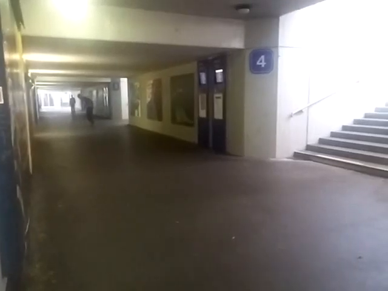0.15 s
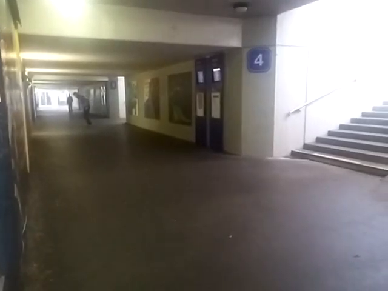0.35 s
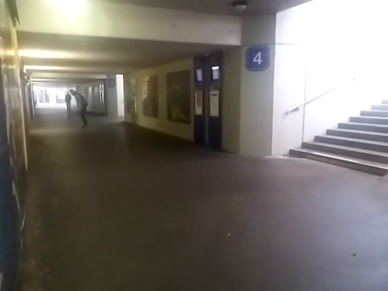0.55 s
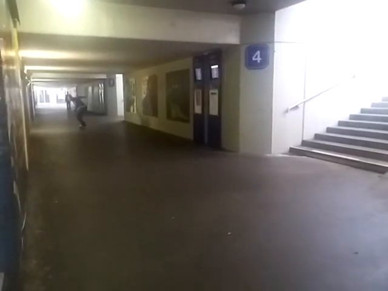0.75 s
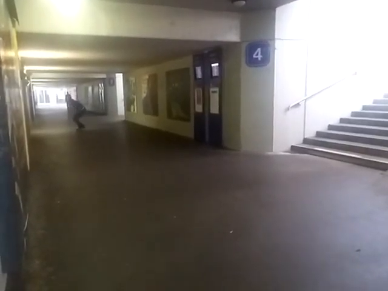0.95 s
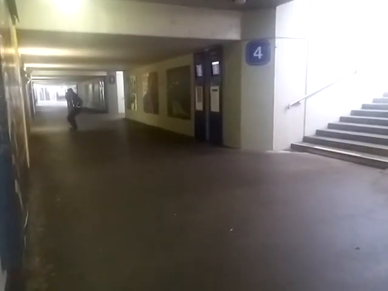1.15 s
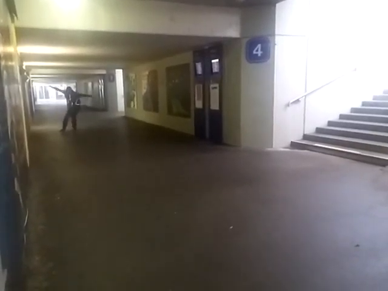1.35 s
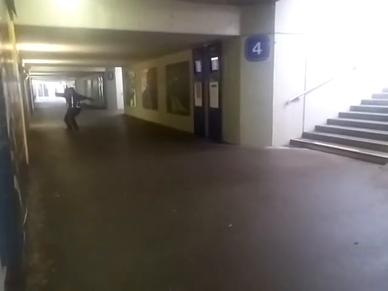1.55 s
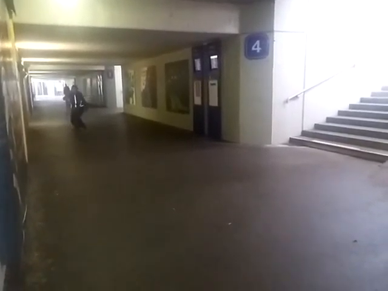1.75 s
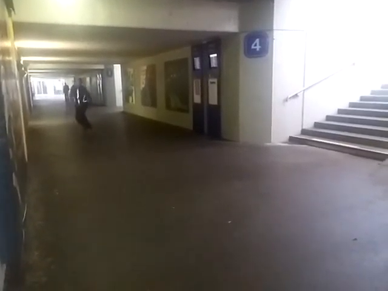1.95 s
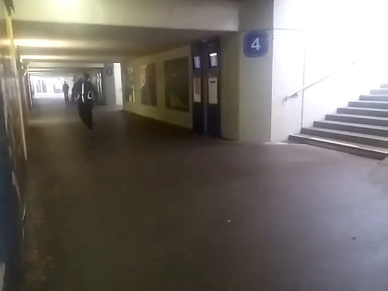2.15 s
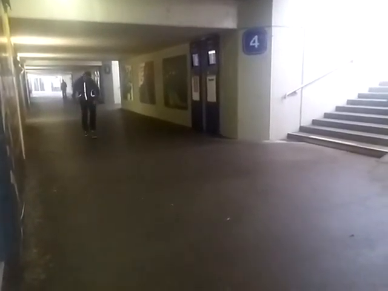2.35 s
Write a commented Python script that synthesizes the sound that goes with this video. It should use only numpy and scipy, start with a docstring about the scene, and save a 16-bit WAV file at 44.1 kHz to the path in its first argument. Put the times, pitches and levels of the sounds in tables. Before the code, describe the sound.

A skateboard rolls over a gritty floor, slides sideways with a loud juddering scrape, a few knocks and a brief squeal, then rolls on. It is heard from a distance in an echoing concrete underpass.

```python
"""A skateboard slides sideways in a long concrete underpass: four wheels scrape, judder and briefly
squeal, then grip again, with a few knocks under the rider's weight. Before and after, the wheels drone
and hiss over floor grit and the trucks tick now and then, above a low murmur of distant noise.
Two microphones 13 cm apart stand far enough off that nearly everything arrives as reverberation;
the slide just overloads them."""
import sys
import numpy as np
from scipy import signal
from scipy.fft import rfft, irfft
from scipy.io import wavfile

SR = 44100
rng = np.random.default_rng(int(sys.argv[2]) if len(sys.argv) > 2 else 0)


def put_to_file(sound):
    """Save the sound as 16-bit audio at rate SR, in the file named by the first command-line argument."""
    columns = np.atleast_2d(sound).T  # one column per channel
    safe = np.clip(columns, -1, 1)
    whole_steps = np.round(safe * 32767)
    wavfile.write(sys.argv[1], SR, whole_steps.astype(np.int16))


N = 110250

GROWL_HZ, HISS_HZ, TREBLE_HZ = 400, 1370, 3300  # band edges: growl below, hiss and treble above
CHATTER_HZ, CHATTER_DB = 35.3, 2  # judder of the sliding wheels: speed and level spread


def undb(db):
    """Decibels to gain."""
    return 10 ** (np.asarray(db) / 20)


def unit(x):
    """Scale to an rms of 1."""
    return x / np.sqrt(np.mean(x ** 2) + 1e-18)


def clock():
    """Time of each sample in seconds."""
    return np.arange(N) / SR


def freqs():
    """Frequency of each spectral bin in Hz."""
    return np.maximum(np.arange(N // 2 + 1) * SR / N, 1)


def on_log(points):
    """Spread (Hz, value) points over the bins, along a log-frequency axis."""
    hz, values = np.array(points, float).T
    return np.interp(np.log(freqs()), np.log(np.maximum(hz, 1)), values)


def below(hz):
    """Gain of a smooth low-pass."""
    return 1 / (1 + (freqs() / hz) ** 6)


def bell(hz, octaves):
    """Gain of a bell-shaped band around hz."""
    return np.exp(-.5 * (np.log2(freqs() / hz) / octaves) ** 2)


def shape(x, gain):
    """Filter by a gain for each frequency."""
    return irfft(rfft(x) * gain, N)


def walk(hz):
    """Smooth random wander with a spread of 1."""
    return unit(shape(rng.standard_normal(N), np.exp(-(freqs() / hz) ** 2)))


def grains(per_s, spread_db):
    """Dense tiny impacts of uneven size."""
    hits = rng.random(N) < per_s / SR
    return unit(hits * rng.standard_normal(N) * undb(spread_db * walk(per_s)))


def burst(start, ring_s, gain, attack_s=.003):
    """A short rattle that dies away in the given colour."""
    age = np.maximum(clock() - start, 0)
    envelope = (1 - np.exp(-(age / attack_s) ** 2)) * np.exp(-age / ring_s)
    return unit(shape(rng.standard_normal(N), gain)) * envelope


def at_mics(pair, spacing_m=.13, left_leads_s=47e-6):
    """Two unrelated signals become a diffuse field at a spaced pair: alike only in the bass."""
    alike = np.sinc(2 * freqs() * spacing_m / 343)
    delay = np.exp(-2j * np.pi * freqs() * left_leads_s)
    right = shape(pair[0], alike * delay) + shape(pair[1], np.sqrt(1 - alike ** 2))
    return np.array([pair[0], right])


def underpass(direct_db=-15, early_db=-1.5, early_s=.017):
    """Response from far off: weak direct sound, a cluster of wall echoes, a long tail that darkens."""
    # Decay between the concrete walls. Each row: frequency in Hz, reverberation time in seconds.
    decay_times = [(100, 1.9), (500, 1.88), (1000, 1.36), (2000, 1.48), (4000, 1.6), (8000, 0.78),
                   (14000, 0.49)]
    t, noise, tail = clock(), rng.standard_normal((2, N)), 0
    for hz, t60 in decay_times:
        band = on_log([(f, f == hz) for f, _ in decay_times])
        tail = tail + shape(noise, band) * unit(undb(-60 * t / t60))
    early = unit(rng.standard_normal((2, N)) * np.exp(-t / early_s))
    arrival = SR // 1000
    echoes = np.roll(tail + undb(early_db) * early, arrival, axis=1)
    response = at_mics(echoes) / np.sqrt(N)
    response[:, arrival] += undb(direct_db)
    return unit(response) / np.sqrt(N)


def in_underpass(x):
    """Carry a sound down the underpass to the microphones; each spot has its own echoes."""
    return signal.fftconvolve(x[None], underpass(), axes=1)[:, :N]


def murmur(level_db=-44):
    """Distant noise hums low and steadily all around the microphones."""
    diffuse = at_mics(rng.standard_normal((2, N)))
    return undb(level_db) * unit(shape(diffuse, bell(hz=168.5, octaves=.24)))


def truck_ticks():
    """The trucks tick lightly as the board rolls, some ticks brighter than others."""
    # Each row: start in seconds, level in dB, ring time in seconds, tilt in dB per octave.
    ticks = [(.278, -38, .008, 2), (.396, -26, 0.0076, -2.5), (2.135, -36, 0.012, 5)]
    # Spectrum of a tick. Each row: frequency in Hz, level in dB.
    colour = [(500, -14), (2300, -2.5), (4000, -8), (6600, 1.5), (8000, -13), (10500, -12), (14500, -38)]
    octaves = np.log2(freqs() / 4000)
    return sum(undb(db) * burst(start, ring_s, undb(on_log(colour) + tilt * octaves))
               for start, db, ring_s, tilt in ticks)


def board_gain(colour):
    """A broad colour with the resonances of wheels and deck on top."""
    # Each row: resonance in Hz, width in Hz, lift in dB.
    modes = [(732, 54, 2), (1515, 23, 3), (1924, 116, 3), (2203, 190, 4)]
    peaks_db = sum(db / (1 + (2 * (freqs() - hz) / width) ** 2) for hz, width, db in modes)
    return undb(on_log(colour) + peaks_db)


def rolling_wheels(turns_per_s=32, throb_db=-.5, grit_db=-2.5):
    """Floor grit shakes the turning wheels: a hollow drone and a hiss, smeared by the echoes."""
    # Spectrum of wheels and deck on the floor. Each row: frequency in Hz, spectral level in dB.
    colour = [(25, -57), (45, -19.5), (75, -37), (110, -24.5), (155, -17), (260, -8.5), (440, -7), (510, 1),
              (730, -2.5), (900, -8), (1200, -7.5), (1700, -11.5), (2200, -14), (2650, -20.5),
              (4000, -27.5), (6000, -32.5), (7600, -43.5), (10500, -47), (12500, -58), (15000, -86)]
    # Course of the roll. Each row: time in seconds, then drone level, hiss level and treble lift in dB.
    course = [(.23, -22, -31, 2.5), (.36, -23.5, -32.5, -2.5), (.43, -24, -28, -3),
              (.56, -24.5, -31.5, -1.5), (.68, -24, -34.5, 1.5), (.8, -25.5, -29, -3.5),
              (.94, -23.5, -38, 1), (1.06, -24.5, -37, 1.5), (1.17, -25, -37.5, 3.5),
              (1.851, -24.5, -28.5, -7), (2.02, -23.5, -31, -4.5), (2.17, -23.5, -28, -4.5),
              (2.28, -27, -32.5, -3), (2.38, -28.5, -36, -1.5), (2.49, -26, -38.5, 0.5)]
    t, f = clock(), freqs()
    turns = np.cumsum(turns_per_s * (1 + .04 * walk(hz=2))) / SR
    bumps = grains(per_s=2000, spread_db=2) * undb(throb_db * np.sin(2 * np.pi * turns))
    wash = at_mics(rng.standard_normal((2, N)))  # echoes blurred into plain noise
    grit = undb(grit_db) * shape(bumps, rfft(underpass()))
    roll = shape(wash + grit, board_gain(colour))
    when, *levels = np.array(course).T
    drone_db, hiss_db, lift_db = (np.interp(t, when, db) for db in levels)
    mono = roll.mean(0)  # each band is scaled by the strength of its core
    drone = shape(roll, below(HISS_HZ)) / np.std(shape(mono, (f > 300) & (f < 900)))
    hiss = shape(roll, 1 - below(HISS_HZ)) / np.std(shape(mono, (f > 1400) & (f < 7000)))
    hiss = hiss + shape(hiss, 1 - below(TREBLE_HZ)) * (undb(lift_db) - 1)
    return drone * undb(drone_db + .5) + hiss * undb(hiss_db - .5)


def deck_knocks():
    """Wheels and deck knock as the board swings round and takes the rider's weight."""
    # Each row: start in seconds, level in dB, centre in Hz, ring time in seconds.
    knocks = [(1.282, -2, 1800, 0.02), (1.354, -15, 245, 0.0067), (1.44, -33.5, 45, 0.022)]
    return sum(undb(db) * burst(start, ring_s, bell(hz, octaves=.27)) for start, db, hz, ring_s in knocks)


def wheel_squeals(edge_s=.004, jitter_hz=132.4):
    """Single wheels lock into unsteady stick-slip for a moment: nearly pure, wavering tones."""
    # Each row: start and length in seconds, pitch in Hz, level in dB, jitter as a share of the pitch.
    squeals = [(1.328, .27, 524.6, -18, 0.0336), (1.385, .27, 494, -20, 0.019),
               (1.428, .11, 2160, -18, 0.02522), (1.493, 0.074, 726, -17.5, 0.009),
               (1.521, 0.085, 987, -16.5, 0.0083)]
    t, tones = clock(), 0
    for start, length, hz, db, jitter in squeals:
        phase = 2 * np.pi * np.cumsum(hz * (1 + jitter * walk(jitter_hz))) / SR
        gate = np.clip(np.minimum(t - start, start + length - t) / edge_s, 0, 1)
        chatter = undb(CHATTER_DB * walk(CHATTER_HZ))
        tones = tones + undb(db) * gate * unit(np.sin(phase) * chatter)
    return tones


def wheel_scrape(trim_db=-3):
    """One pair of wheels dragged sideways: chattering slips that growl as they bite, rasp and sizzle."""
    # Spectrum of wheels slipping on concrete. Each row: frequency in Hz, spectral level in dB.
    colour = [(100, -53), (200, -20), (420, -11.5), (520, -3.5), (640, -9), (850, -5.5), (1400, -1),
              (2200, -4.5), (2650, -10), (4000, -18.5), (5800, -20.5), (7600, -30.5), (10500, -33.5),
              (13000, -47.5), (15000, -56)]
    # Sideways friction. Each row: time in seconds, then gains of growl, rasp and sizzle in dB.
    friction = [(1.188, -42, -31, -34), (1.235, -6, -22.5, -27), (1.28, -0.5, -14, -11.5),
                (1.32, 0.5, -9.5, -11.5), (1.38, 0, -8.5, -3.5), (1.45, -35, -6.5, -12),
                (1.51, -34, -6, -11.5), (1.565, -22, -13.5, -9), (1.62, -22, -10, -14.5),
                (1.7, -42, -14.5, -46), (1.801, -7, -29, -55)]
    when, *levels = np.array(friction).T
    slips = unit(shape(grains(per_s=3000, spread_db=4.5), board_gain(colour)))
    bands = below(GROWL_HZ), below(TREBLE_HZ) - below(GROWL_HZ), 1 - below(TREBLE_HZ)
    scrape = 0
    for band, db in zip(bands, levels):
        envelope = undb(np.interp(clock(), when, db, left=-np.inf, right=-np.inf))
        scrape = scrape + shape(slips, band) * envelope
    return scrape * undb(trim_db + CHATTER_DB * walk(CHATTER_HZ))


def scene():
    """The rolling board and the slide of both axles, heard from down the underpass."""
    slide = sum(in_underpass(wheel_scrape()) for axle in range(2))
    ticks, squeals = truck_ticks(), wheel_squeals()
    roll = rolling_wheels()
    echoing = in_underpass(squeals + deck_knocks() + ticks)
    straight = undb(-5.5) * ticks + undb(-6.5) * squeals  # direct path on top of the echoes
    return murmur() + roll + echoing + straight + slide


def record(dry, start_s=.226, top_hz=15000):
    """The right microphone is duller; the sound cuts in, the highest peaks clip and the top is cut."""
    # Balance of the pair. Each row: frequency in Hz, left minus right in dB.
    balance = [(200, -1), (700, 1.5), (2200, -1.5), (3500, -0.5), (5500, 1), (6500, 5.5), (7600, 17),
               (12000, 14.5)]
    ratio = undb(on_log(balance))
    right_gain = np.sqrt(2 / (1 + ratio ** 2))  # keeps the summed power
    heard = shape(dry, np.array([ratio * right_gain, right_gain]))
    clipped = np.clip(heard * (clock() >= start_s), -1, 1)
    return signal.sosfilt(signal.ellip(8, .2, 70, top_hz, fs=SR, output="sos"), clipped)


dry = scene()
out = record(dry)
put_to_file(out)
```